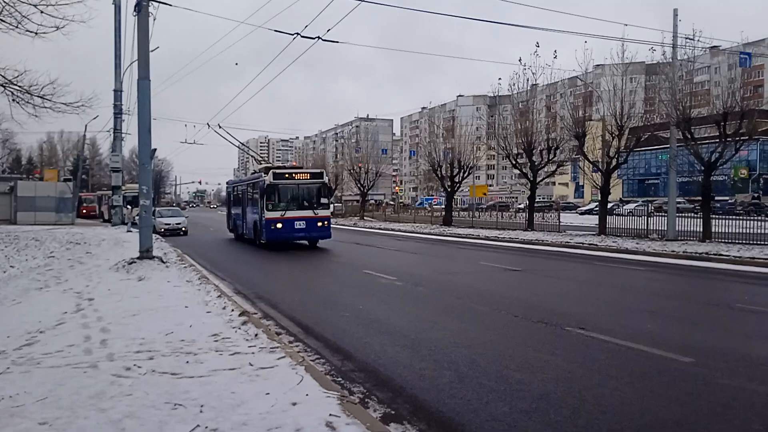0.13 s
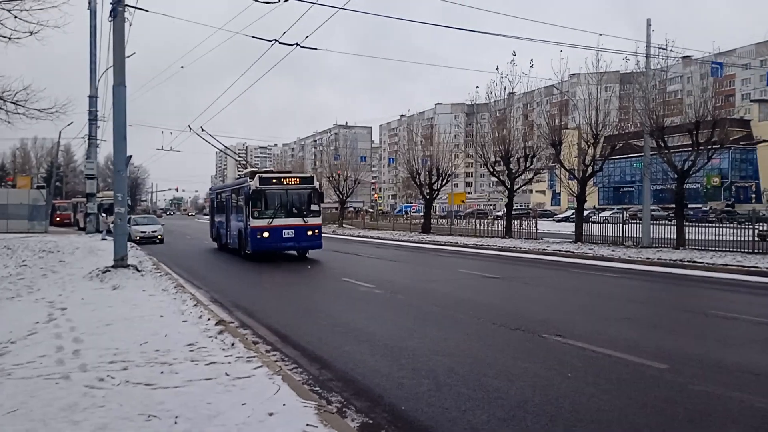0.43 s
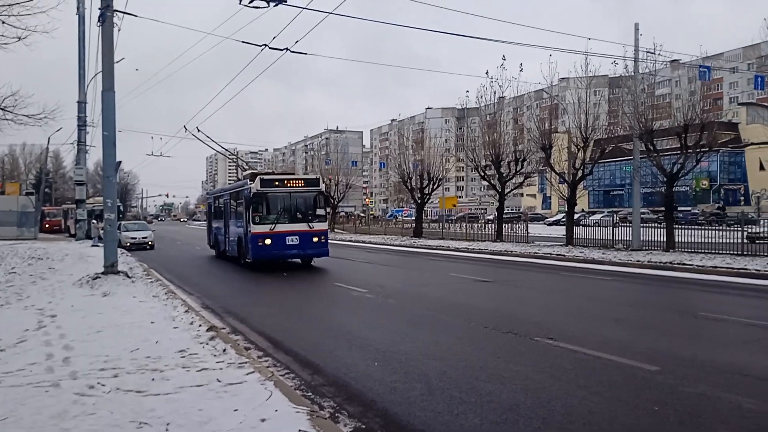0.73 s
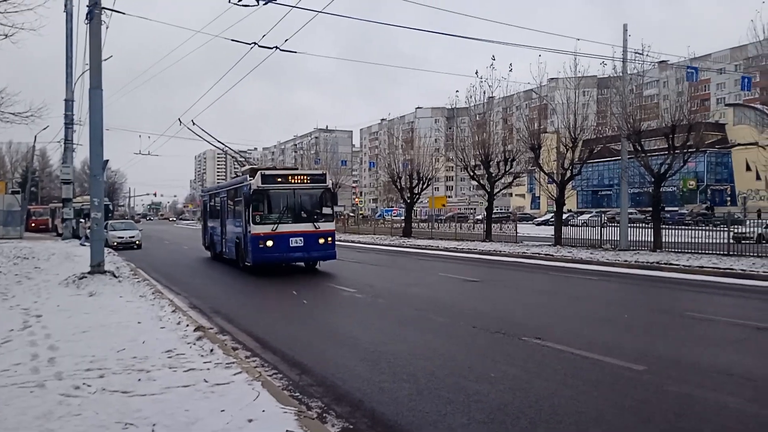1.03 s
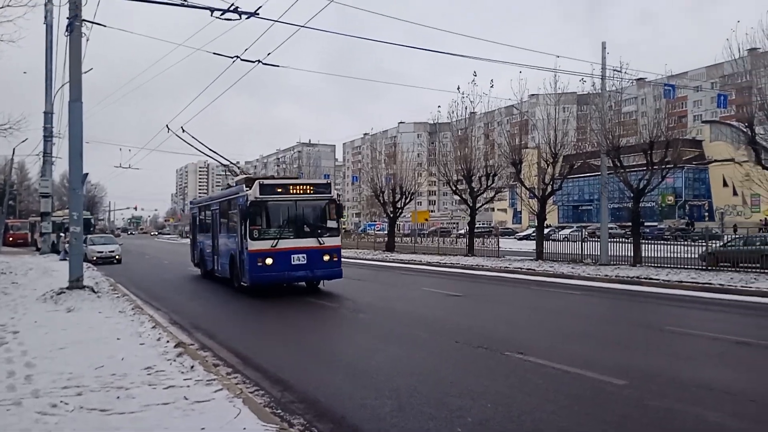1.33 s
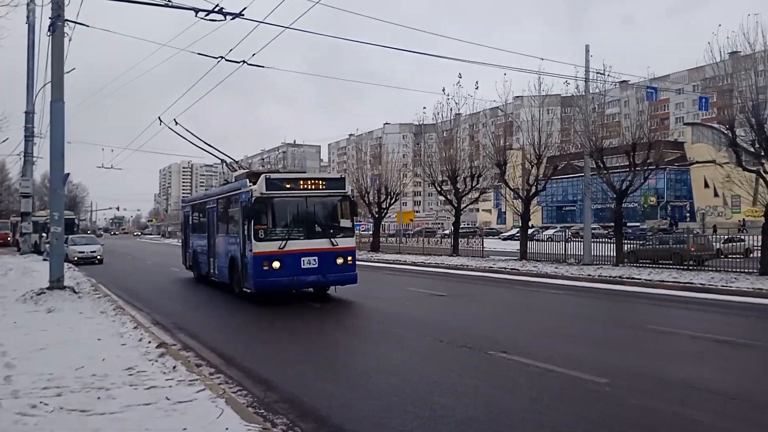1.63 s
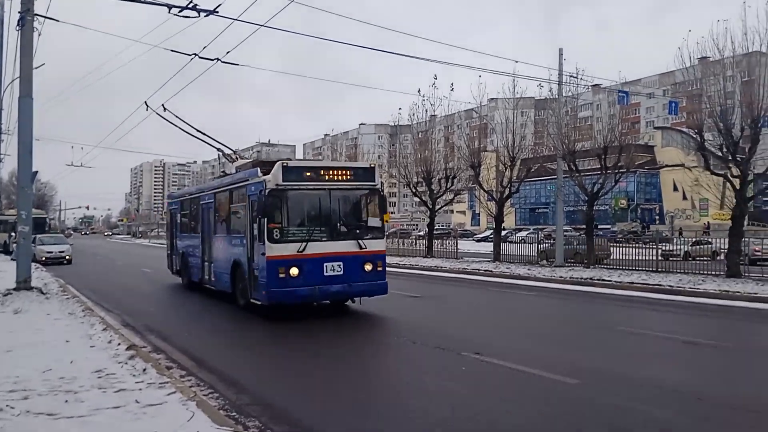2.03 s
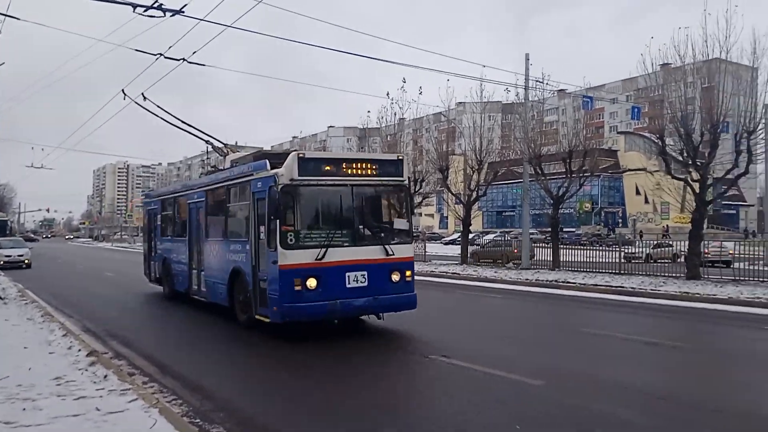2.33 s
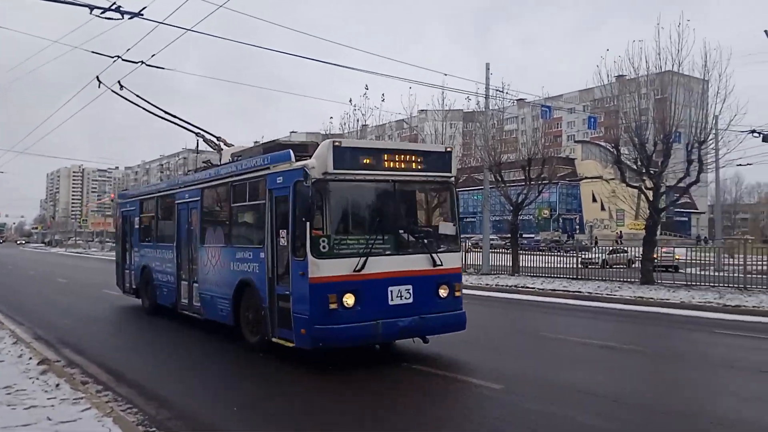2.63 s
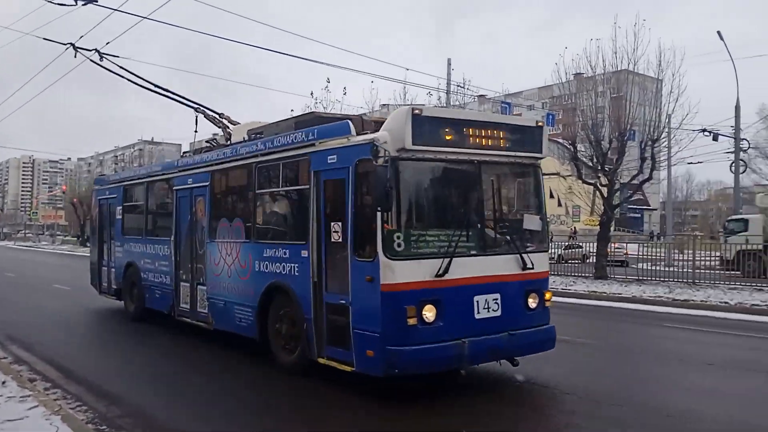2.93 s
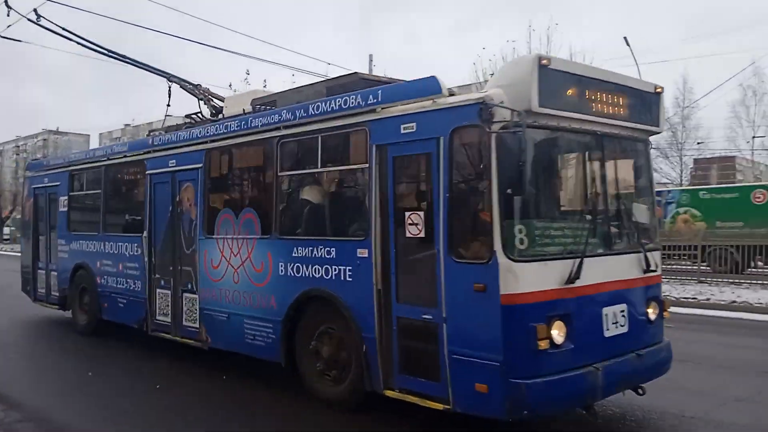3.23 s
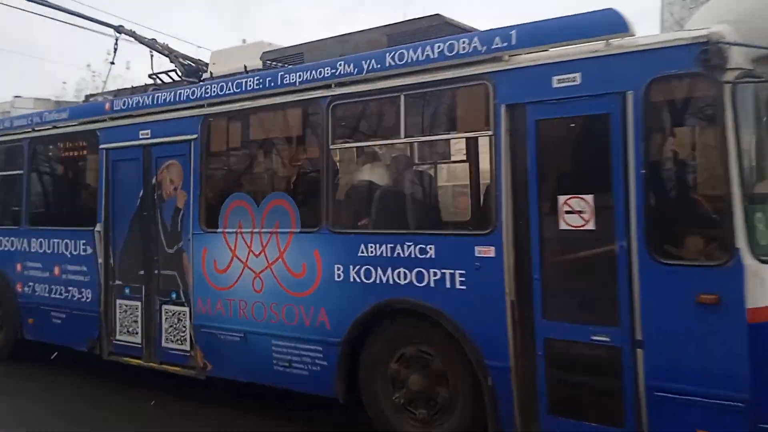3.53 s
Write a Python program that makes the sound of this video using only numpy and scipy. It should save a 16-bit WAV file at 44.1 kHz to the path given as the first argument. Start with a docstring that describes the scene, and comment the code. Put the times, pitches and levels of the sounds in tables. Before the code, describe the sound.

An approaching trolleybus swells from distant traffic wash to close tyre roar, with whining motor and wire hiss.

```python
"""A wet city road: an electric bus on overhead wires speeds up towards the listener.
Behind it lie a wash of far traffic, a slowing engine and a car that has just passed and fades away.
Shaped noise makes the tyres, rumble and rustle; wavering sines make the climbing motor and gear whine.
Resonated noise makes the hiss of the poles on the wires; decaying sines and noise make their jolts.
Short soft-edged low tones swell in the rumble. A thin treble rustle comes and goes near by,
with ticks and a whistle; all fades in from silence."""
import sys
import numpy as np
from scipy import signal
from scipy.io import wavfile
from scipy.ndimage import uniform_filter1d

SR = 44100
rng = np.random.default_rng(int(sys.argv[2]) if len(sys.argv) > 2 else 0)


def to_wav(sig):
    """Store sig (one row per channel, or 1-D mono) as 16-bit WAV at the path in sys.argv[1].

    Samples outside -1..1 are clipped; the rate is SR.
    """
    pcm = np.clip(np.atleast_2d(sig), -1, 1) * 32767
    pcm = np.round(pcm).astype(np.int16)
    wavfile.write(sys.argv[1], SR, pcm.T)  # frames by channels


def invert_db(level):
    """Linear amplitude ratio for a level in decibels (20 dB per decade), elementwise."""
    return 10 ** (np.asarray(level, dtype=float) / 20)


N = 163170  # samples


def evened(x):
    """Normalisation: scales a signal to an rms of 1."""
    return x / np.sqrt(np.mean(x ** 2) + 1e-20)


def read(points, hz):
    """Spectral envelope: interpolates dB along log frequency, -90 dB outside the points."""
    f, value = np.transpose(points)
    return np.interp(np.log(hz + 1), np.log(f + 1), value, left=-90, right=-90)


def curve(rows, column=1, silent=None):
    """Time envelope: straight lines between rows; outside them the end values, or silent if given."""
    rows = np.array(rows)
    return np.interp(np.arange(N) / SR, rows[:, 0], rows[:, column], silent, silent)


def add(mix, s, sound):
    """Superposition: adds a sound into the mix from s seconds on."""
    part = mix[round(s * SR):][:len(sound)]
    part += sound[:len(part)]


def resonate(x, hz, width):
    """Resonance of gain 1 that follows hz: shifts that pitch to 0 Hz, low-passes, shifts back."""
    turn = np.exp(2j * np.pi * np.cumsum(hz * np.ones(len(x))) / SR)
    r = np.exp(-np.pi * width / SR)
    return 2 * (turn * signal.lfilter([1 - r], [1, -r], x / turn + 1e-18)).real


def wobble(seconds):
    """Slow random modulation: white noise averaged twice over the given time, rms 1."""
    size = max(round(seconds * SR), 2)
    return evened(uniform_filter1d(uniform_filter1d(rng.standard_normal(N), size), size))


def noise(spectrum, patchy_db, flicker_db, size=1024):
    """Short-time synthesis: random spectra with drifting patches and a flicker shared by all bins."""
    hop = size // 4
    frames = N // hop + 5
    hz = np.fft.rfftfreq(size, 1 / SR)
    a, b, patches = rng.standard_normal((frames, len(hz), 3)).T
    patches = evened(uniform_filter1d(uniform_filter1d(patches, 8, 0), 8, 1))
    flicker = evened(uniform_filter1d(rng.standard_normal(frames), 3))
    level_db = read(spectrum, hz)[:, None] + patchy_db * patches + flicker_db * flicker
    z = (a + 1j * b) * invert_db(level_db)
    return evened(signal.istft(z, nperseg=size, noverlap=size - hop)[1][:N])


def tone(hz, db, waver, flutter_db):
    """Frequency and amplitude modulation: a sine that wavers in pitch and comes and goes in level."""
    level = invert_db(db + flutter_db * (wobble(.025) + wobble(.09)))
    phase = 2 * np.pi * np.cumsum(hz * (1 + waver * wobble(.03))) / SR
    return np.sqrt(2) * level * np.sin(phase)


def far_traffic():
    """Superposition of many far sources: steady noise with a spectrum weighted to the bass."""
    # colour of the wash: pitch_hz, density_db (per Hz, relative)
    wash_colour = [(20, -57), (32, -12), (45, -32), (60, -10.5), (100, -2.5), (140, -3.5), (200, -4),
                   (250, -9), (400, -10.5), (500, -16), (750, -15.5), (1180, -11), (1700, -18), (2400, -30),
                   (3100, -24), (4800, -36.5), (6400, -44), (8000, -85), (9500, -60), (12000, -65.5),
                   (13900, -77), (14800, -55), (15700, -50)]
    return invert_db(-42) * noise(wash_colour, patchy_db=2.23, flicker_db=0.8, size=2048)


def slowing_engine():
    """Harmonic orders of the engine speed, blurred by uneven firing: narrow bands of noise."""
    # engine orders: time_s, order_1_hz, order_2_db, order_3_db
    orders = [(.2, 75, -60, -48.5), (.7, 71.5, -54.5, -50), (1.2, 69, -57, -47.5), (1.6, 68, -54.5, -48.5),
              (1.9, 68, -50.5, -64), (2.3, 66, -51.5, -51), (2.8, 65, -50.5, -52.5),
              (3.3, 64.5, -42.5, -52.5), (3.7, 66, -52.5, -40)]
    width_hz = 8  # of the first resonance; the second is twice as wide
    firing = rng.standard_normal(N)
    hz = curve(orders)
    out = np.zeros(N)
    for k in (2, 3):
        narrow = resonate(firing, k * hz, width_hz)
        order = evened(resonate(narrow, k * hz, 2 * width_hz))
        out += invert_db(curve(orders, k)) * order
    return out


def leaving_car():
    """Tyre noise: a broad spectrum whose level falls away as the car leaves."""
    # colour of the tyres: pitch_hz, density_db (per Hz, relative)
    tyre_colour = [(30, -16), (60, 9), (100, -2), (200, -2.5), (300, -19), (600, -7.5), (800, -22),
                   (1150, -1), (1600, -2.5), (2000, -1.5), (2400, -11.5), (4000, -23.5), (6000, -23),
                   (7500, -38), (9000, -61)]
    # level of the car: time_s, level_db
    car_level = [(.1, -48), (.35, -44.5), (.5, -44.5), (.7, -43.5), (.87, -46), (1.05, -47.5), (1.3, -51),
                 (2, -68.5), (3.7, -84)]
    return invert_db(curve(car_level)) * noise(tyre_colour, patchy_db=1.2, flicker_db=1.6)


def rustle():
    """Amplitude-modulated noise: a treble body and a thin top swell separately in bursts."""
    # colour of the body: pitch_hz, density_db (per Hz, relative)
    body_colour = [(2300, -18), (3500, 0.5), (4700, 1), (5900, -1), (6900, -5), (8100, -23), (9300, -14.5),
                   (10700, -20.5), (11300, -22), (12300, -10.5), (13200, -18), (14200, -30), (14500, -50)]
    # colour of the top: pitch_hz, density_db (per Hz, relative)
    top_colour = [(13500, -40), (14200, -27), (14900, 2), (15700, -2)]
    # bursts: time_s, body_level_db, top_level_db
    bursts = [(.095, -77, -95), (.125, -50, -54), (.2, -53.5, -62), (.3, -55, -66), (.345, -61, -69),
              (.375, -67, -83), (.42, -62, -82), (.44, -57, -63), (.51, -52, -60), (.55, -57, -71),
              (.58, -57, -58.5), (.6, -55, -66), (.66, -54.5, -67), (.72, -55.5, -61), (.76, -59, -69),
              (.79, -51, -62), (.82, -59, -64), (.9, -59.5, -67), (.95, -66, -73), (1.005, -82, -86),
              (1.02, -59.5, -64), (1.05, -82, -75), (1.075, -70, -83), (1.095, -86, -93)]
    body = noise(body_colour, patchy_db=2.0, flicker_db=0.4, size=256)
    top = noise(top_colour, patchy_db=1.2, flicker_db=1.2, size=256)
    return invert_db(curve(bursts, 1, -110)) * body + invert_db(curve(bursts, 2, -110)) * top


def treble_ticks():
    """Transients of band-limited noise: a quick rise and an exponential decay."""
    # faint ticks: start_s, level_db (before rise and decay), pitch_hz
    ticks = [(1.483, -75, 9400), (1.701, -80, 13000), (1.978, -76, 9200), (2.234, -72, 9600),
             (2.375, -71, 15170), (2.554, -75, 15100), (2.605, -76, 14900), (2.779, -78, 14900),
             (2.909, -78, 9700), (3.277, -67, 13300), (3.465, -74, 15280)]
    rise_s, t60_s, width_hz = 0.0037, .1, 2500  # width of each of two resonances
    t = np.arange(SR // 10) / SR
    out = np.zeros(N)
    for s, db, hz in ticks:
        band = resonate(rng.standard_normal(len(t)), hz, width_hz)
        puff = evened(resonate(band, hz, width_hz))
        add(out, s, invert_db(db - 60 * t / t60_s) * np.minimum(t / rise_s, 1) * puff)
    return out


def high_whistle():
    """Narrow-band noise: a sharp resonance turns white noise into a thin, unsteady pitch."""
    # level of the whistle: time_s, level_db
    whistle_level = [(.3, -95), (.45, -80), (.9, -76), (.97, -98), (1.1, -84), (1.18, -105)]
    whistle = evened(resonate(rng.standard_normal(N), hz=13400, width=90))
    return invert_db(curve(whistle_level, 1, -120)) * whistle


def low_swells():
    """Enveloped sines: short soft-edged low tones in the rumble that rise and die away."""
    # low swells: start_s, level_db (before rise and decay), pitch_hz
    swells = [(0.317, -27.5, 147), (0.484, -36, 214), (1.592, -32, 170), (1.87, -25.5, 130),
              (1.914, -26.5, 134), (2.124, -26, 129), (2.296, -36, 216), (3.028, -22.5, 186),
              (3.191, -34, 255), (3.66, -24, 208)]
    rise_s, t60_s = 0.015, 0.11
    t = np.arange(SR // 4) / SR
    rise = np.sin(np.pi / 2 * np.minimum(t / rise_s, 1)) ** 2
    shape = rise * invert_db(-60 * t / t60_s)
    out = np.zeros(N)
    for s, db, hz in swells:
        add(out, s, invert_db(db) * shape * np.sin(2 * np.pi * (hz * t + rng.random())))
    return out


def bus_rumble():
    """Body-borne sound: low noise of the bus body under a time envelope."""
    # colour of the rumble: pitch_hz, density_db (per Hz, relative)
    rumble_colour = [(25, -23), (50, -13), (100, 1.5), (160, -7.5), (260, 3), (350, -0.5), (450, -7),
                     (600, -13), (900, -33)]
    # level of the rumble: time_s, level_db
    rumble_level = [(0, -55.5), (1.5, -51), (2.1, -54), (2.6, -45), (3, -45), (3.3, -39), (3.5, -39.5),
                    (3.6, -34.5), (3.7, -37)]
    return invert_db(curve(rumble_level)) * noise(rumble_colour, patchy_db=1.4, flicker_db=1)


def bus_rolling():
    """Spherical spreading: tyre and body noise grows as 1 / distance on a straight, even approach."""
    # colour of tyres and body: pitch_hz, density_db (per Hz, relative)
    rolling_colour = [(300, -7), (500, -6.5), (750, -2.5), (900, 0.5), (1060, 2), (1500, -6), (2000, -6),
                      (2600, -7), (4000, -16), (5500, -21.5), (6500, -17), (7600, -34), (8800, -59),
                      (10000, -35), (13500, -36.5), (14200, -39), (15000, -29), (15700, -32)]
    db_at_10_m, speed_m_s, abeam_s, lane_m = -49.5, 13, 3.73, 4.8
    metres = np.hypot(speed_m_s * (np.arange(N) / SR - abeam_s), lane_m)
    rolling = noise(rolling_colour, patchy_db=2.0, flicker_db=-0.6)
    return invert_db(db_at_10_m) * 10 / metres * rolling


def bus_whine():
    """Tonal machine noise: motor and gear lines climb in pitch as the bus speeds up."""
    # motor and gear line: time_s, pitch_hz, level_db, octave_level_db
    motor = [(.9, 367, -65, -73), (1.4, 385, -59, -73), (1.9, 404, -56, -70), (2.2, 412, -55, -62),
             (2.55, 425, -54, -68), (2.9, 432, -60, -61), (3.05, 434, -61, -56), (3.35, 442, -63, -55),
             (3.5, 445, -61, -66), (3.7, 447, -61, -62)]
    # second gear line: time_s, pitch_hz, level_db
    gear = [(1.5, 522, -68), (1.9, 540, -63), (2.2, 551, -62), (2.6, 570, -66), (3, 590, -63),
            (3.3, 606, -57), (3.6, 611, -56), (3.7, 612, -61)]
    out = tone(curve(gear), curve(gear, 2, -90), waver=.0035, flutter_db=2)
    for k in (1, 2):  # the line and its octave
        out = out + tone(k * curve(motor), curve(motor, k + 1, -90), waver=.0035, flutter_db=2)
    return out


def wire_hiss():
    """Friction noise: poles sliding on the wires give a fluctuating rub, coloured by resonances."""
    # resonances: pitch_hz, width_hz (of each of two passes), gain_db (relative)
    resonances = [(4910, 1250, 16), (2870, 300, -17.5)]
    # level of the hiss: time_s, level_db
    hiss_level = [(2, -64), (2.55, -60), (2.66, -57), (2.8, -56.5), (2.93, -55.5), (3.05, -58),
                  (3.12, -54.5), (3.2, -53.5), (3.33, -55.5), (3.45, -56), (3.6, -57.5), (3.7, -53)]
    rub = rng.standard_normal(N) * invert_db(2.1 * wobble(0.0016))
    bands = (invert_db(db) * resonate(resonate(rub, hz, w), hz, w) for hz, w, db in resonances)
    return invert_db(curve(hiss_level)) * evened(sum(bands))


def wire_jolts():
    """Impact excitation: a pole jolting over a wire joint rings in its modes and scrapes."""
    # jolts: start_s, level_db (before rise and decay)
    jolts = [(2.645, -58), (3.141, -45), (3.194, -57)]
    # modes of the pole: pitch_hz, level_db (relative to the jolt), t60_s
    modes = [(3320, 5, 0.065), (6611, -10, 0.064), (7698, -17, 0.08)]
    # colour of the scrape: pitch_hz, density_db (per Hz, relative)
    scrape_colour = [(1500, -28), (2600, 2), (3300, -3), (4000, 3), (5000, 1), (6600, -9), (7400, -18),
                     (8200, -39), (12000, -26), (15000, -26), (15700, -16)]
    rise_s, scrape_t60_s = .0015, 0.39
    t = np.arange(SR // 4) / SR
    scrape = noise(scrape_colour, patchy_db=1.5, flicker_db=1, size=256)
    out = np.zeros(N)
    for k, (s, db) in enumerate(jolts):
        ring = sum(invert_db(d - 60 * t / t60) * np.sin(2 * np.pi * (hz * t + rng.random()))
                   for hz, d, t60 in modes)
        # each jolt takes its own stretch of the scrape noise
        puff = scrape[k * len(t):][:len(t)] * invert_db(-60 * t / scrape_t60_s)
        add(out, s, invert_db(db) * np.minimum(t / rise_s, 1) * (ring + puff))
    return out


def scene():
    """Linear superposition of the background, the near treble, the low swells and the bus."""
    background = far_traffic() + slowing_engine() + leaving_car()
    near_treble = rustle() + treble_ticks() + high_whistle()
    bus = bus_rumble() + bus_rolling() + bus_whine() + wire_hiss() + wire_jolts()
    return (background + near_treble + low_swells() + bus)[None]


def top_cut(x):
    """Nothing passes above the cut-off."""
    return signal.sosfilt(signal.butter(12, 17110, fs=SR, output="sos"), x)


def record(dry):
    """High-pass response: the low cut of the microphone, then a fade in from silence."""
    low_cut_hz = 40.5
    fade_start_s, fade_s, opening_s = .078, 0.3, .016
    high_pass = signal.butter(3, low_cut_hz, "highpass", fs=SR, output="sos")
    cut = signal.sosfilt(high_pass, dry)
    t = np.arange(N) / SR - fade_start_s
    fade = np.clip(t / fade_s, 0, 1) ** 0.78
    opening = np.clip(t / opening_s, 0, 1) ** 2  # softens the onset of the fade
    return top_cut(cut * fade * opening)


dry = scene()
out = record(dry)
to_wav(out)
```